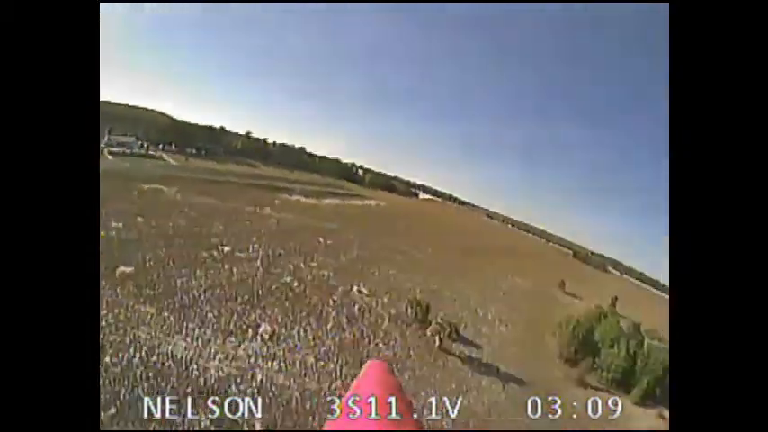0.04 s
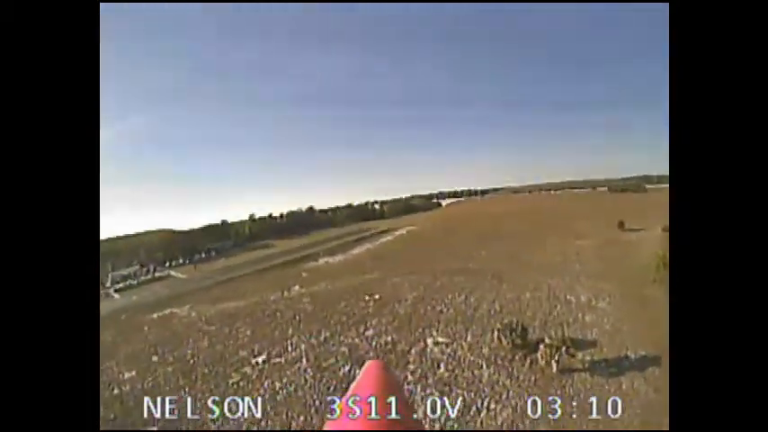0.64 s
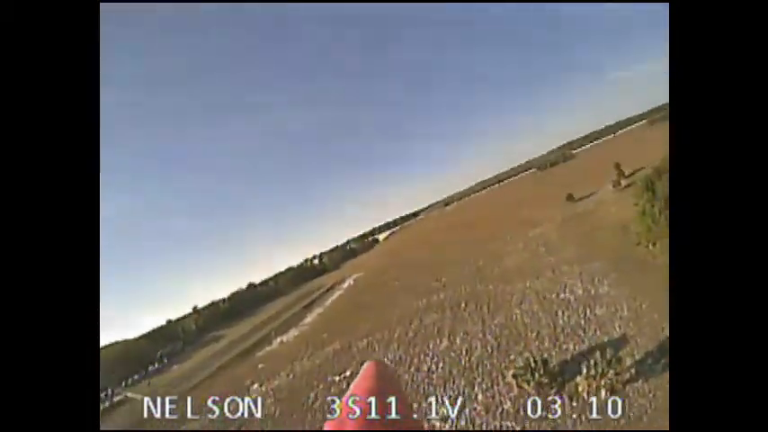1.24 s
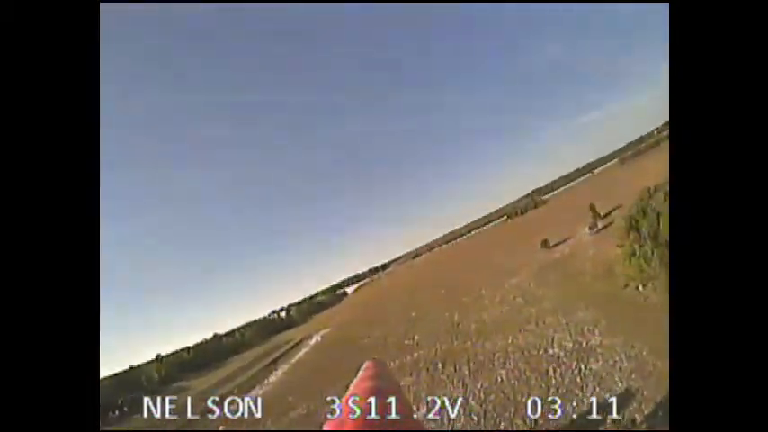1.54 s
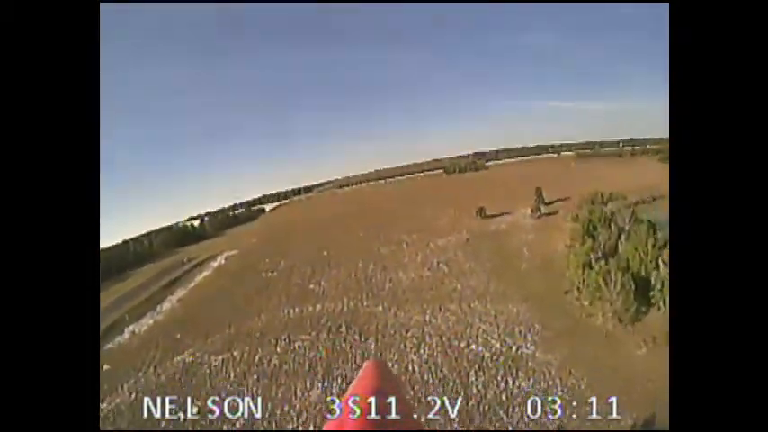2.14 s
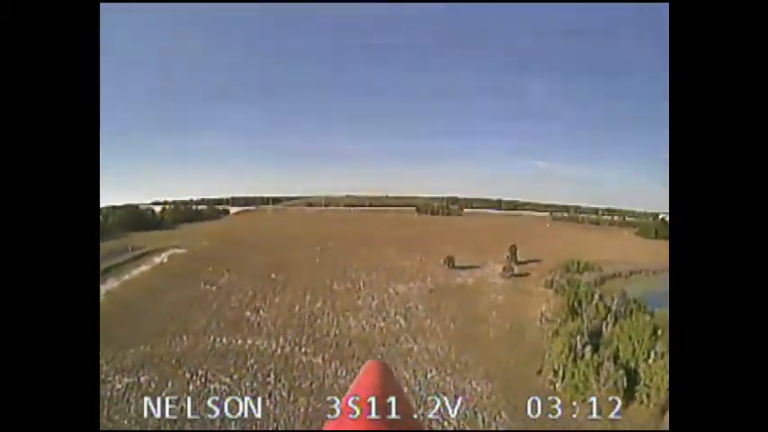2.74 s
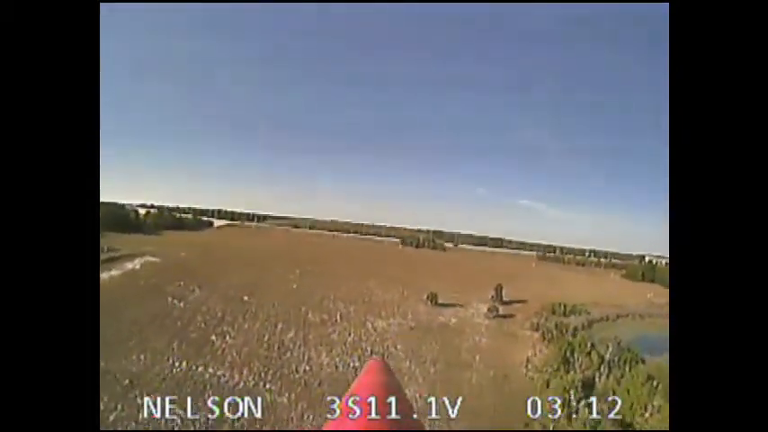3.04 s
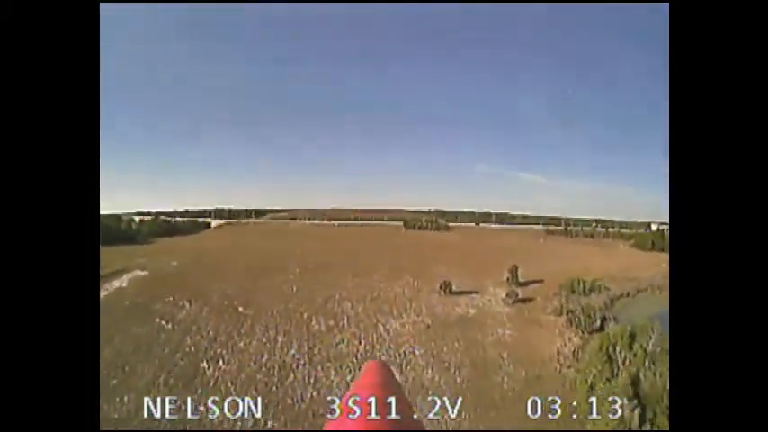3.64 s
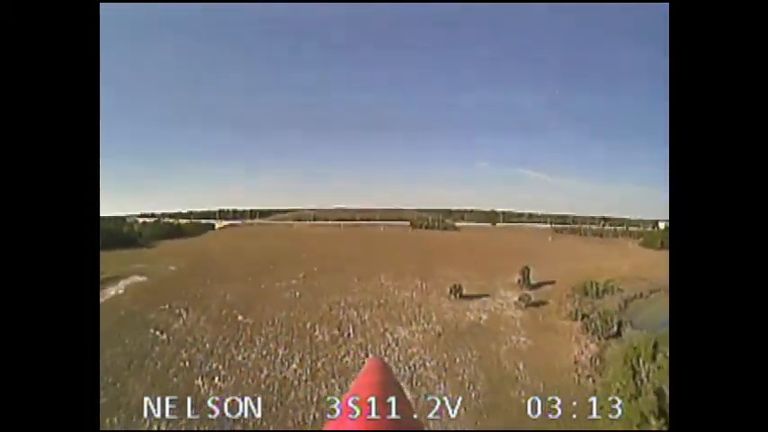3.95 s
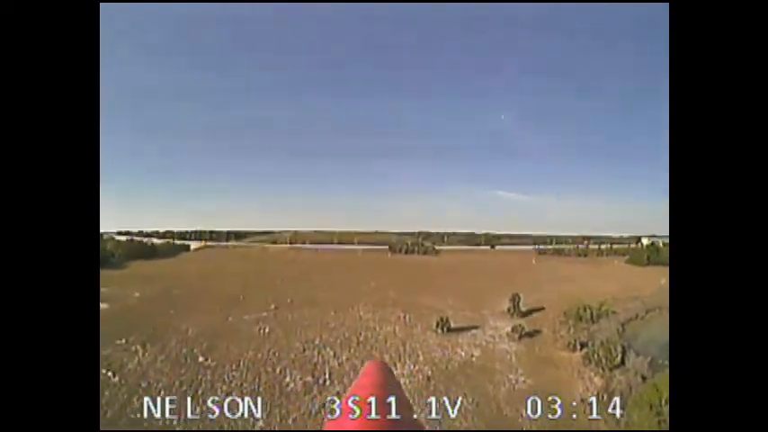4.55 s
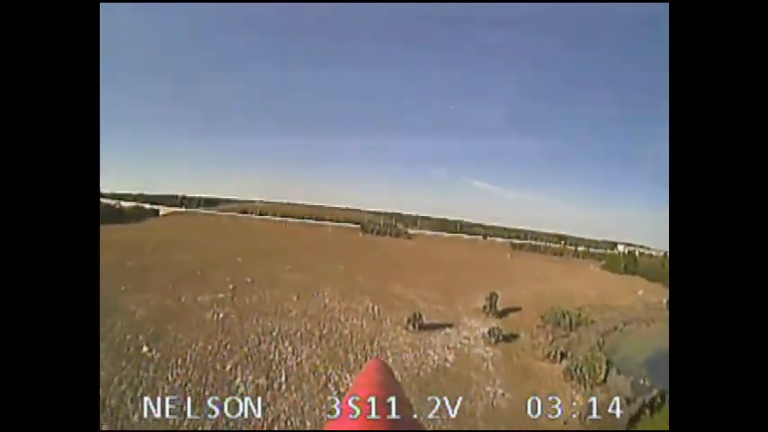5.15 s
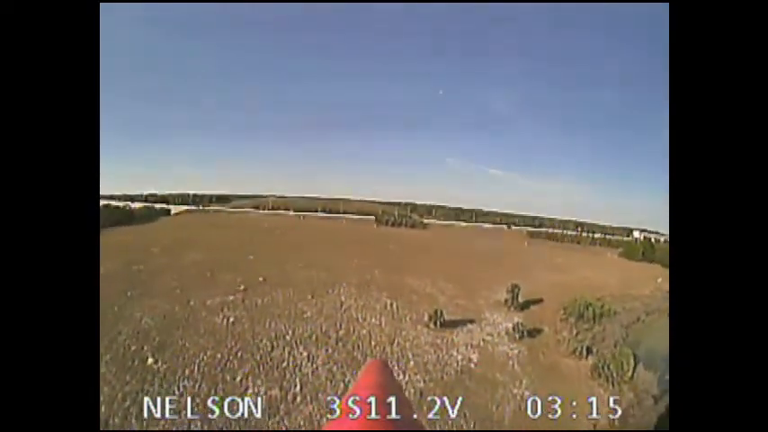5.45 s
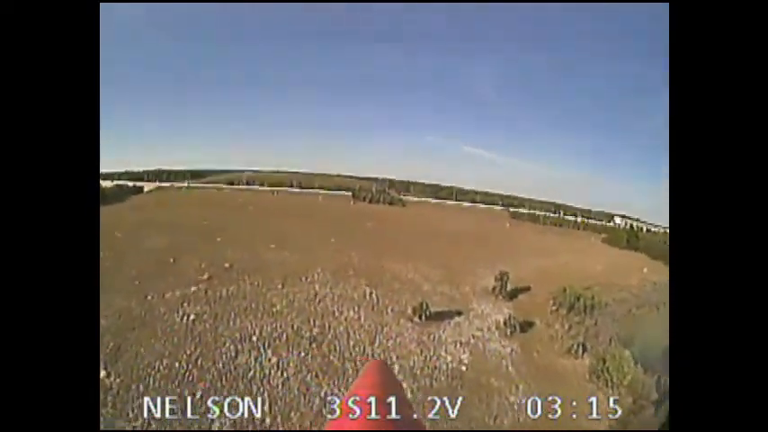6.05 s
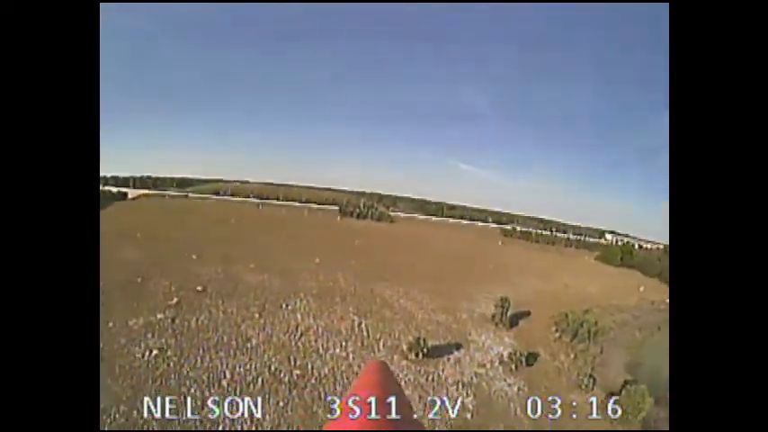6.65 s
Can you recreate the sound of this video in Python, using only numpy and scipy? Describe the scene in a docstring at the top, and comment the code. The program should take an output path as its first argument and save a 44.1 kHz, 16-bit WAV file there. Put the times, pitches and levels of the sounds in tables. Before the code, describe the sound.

A small flapping-wing model flies with a warbling gear and motor whine, under wind buffeting its overloaded onboard microphone.

```python
"""Over open ground, on the back of a flapping radio-controlled ornithopter, at its small camera.
The airstream buffets the microphone. Two drive whines, gear mesh and motor, swell in turn and
bend in pitch as each wing stroke loads them. The microphone preamplifier overloads throughout;
a narrow-band recorder carries the sound on the left channel only."""
import sys
import numpy as np
from scipy import signal
from scipy.fft import rfft, irfft
from scipy.io import wavfile
from scipy.ndimage import uniform_filter1d, map_coordinates

SR = 44100
rng = np.random.default_rng(int(sys.argv[2]) if len(sys.argv) > 2 else 0)


def int16_out(signal):
    """Quantize to a 16-bit WAV file."""
    q = np.round(np.clip(np.atleast_2d(signal).T, -1, 1) * 32767)
    wavfile.write(sys.argv[1], SR, q.astype(np.int16))


N = 299439
TIME_S = np.arange(N) / SR

# Slow airstream gusts: time_s, strength (its swing about the mean is scaled to dB in airstream)
GUSTS = [(0.0, -11.5), (1.25, -12.5), (1.58, -11.5), (2.38, -16.5), (2.5, -15.5), (2.68, -15.5),
         (3.1, -10.5), (3.37, -13.5), (3.51, -11), (4.26, -14.5), (4.41, -13), (4.65, -15.3), (4.76, -12.4),
         (4.97, -14), (5.33, -12), (5.6, -16.5), (6.25, -12.5), (6.79, -13.0)]
# Turbulence at the microphone: freq_hz, relative_density_db
BUFFET_SPECTRUM = [(15, -22), (30, -6.5), (60, -0.5), (105, -0.25), (170, -3.5), (300, -9.5), (500, -13.5),
                   (900, -23.5), (2000, -36), (4000, -47)]
# Air along the airframe: freq_hz, relative_density_db
RUSH_SPECTRUM = [(100, -5.5), (400, -0.5), (800, 0), (1400, -2.5), (2200, -9.5), (2900, -12.5), (3500, -18),
                 (4000, -15)]
# Mean drive speed: time_s, mesh_hz
DRIVE_SPEED = [(0, 574.5), (0.55, 595.8), (1.05, 571.3), (1.7, 575.8), (2.25, 556.6), (2.9, 581.2),
               (3.6, 558.6), (4.7, 559.9), (5.8, 555.5), (6.79, 558.6)]
# Gear whine over one wingbeat: beat_fraction, pitch_to_mesh_ratio, relative_level_db
GEAR_STROKE = [(.04, 1.047, 3.5), (.15, 1.02, -6), (.29, .95, -12.5), (.41, .935, -2.5), (.54, .985, 1.9),
               (.66, 1.015, -2), (.78, 1.0, -8.5), (.91, .985, 1)]
# Partials of the meshing teeth: harmonic_number, relative_level_db
TOOTH_HARMONICS = [(1, 0), (2, -15.5), (3, -24), (4, -23)]
# Rasp of the loaded gear train: freq_hz, relative_density_db
RASP_SPECTRUM = [(300, -8), (1100, 4), (1700, -4), (2300, -7), (2900, -3.5), (3500, -11.5), (4000, -7)]
# Motor whine over one wingbeat: beat_fraction, pitch_to_mesh_ratio, relative_level_db
MOTOR_STROKE = [(.02, 1.87, -18), (.15, 1.83, -3), (.26, 1.72, -2.2), (.34, 1.675, -0.5), (.39, 1.7, -14),
                (.46, 1.79, -4.5), (.53, 1.86, -17), (.62, 1.82, -1), (.73, 1.803, 1), (.85, 1.78, -0.3)]


def undb(db):
    """Decibels to gain."""
    return 10 ** (np.asarray(db) / 20)


def curve(rows):
    """Linear interpolation of (time_s, value) rows."""
    return np.interp(TIME_S, *np.transpose(rows))


def wander(rate_hz):
    """Smooth random drift, standard deviation 1."""
    size = max(int(SR / rate_hz), 2)
    steps = np.repeat(rng.standard_normal(N // size + 1), size)[:N]
    smooth = uniform_filter1d(uniform_filter1d(steps, size), size)
    return smooth / smooth.std()


def noise(spectrum):
    """Unit-rms noise shaped by (freq_hz, density_db) rows."""
    freq_hz, density_db = np.transpose(spectrum)
    bins_hz = np.maximum(np.fft.rfftfreq(N, 1 / SR), 1)
    shape_db = np.interp(np.log(bins_hz), np.log(freq_hz), density_db, right=-120)
    x = irfft(rfft(rng.standard_normal(N)) * undb(shape_db), N)
    return x / x.std()


def airstream(buffet_db=-3, rush_db=-12.5, flicker_db=0.76):
    """Low turbulence swells with gusts and short eddies; the rush above it swells less."""
    eddies = 0.25 * wander(rate_hz=20)
    gust = curve(GUSTS) - curve(GUSTS).mean() + eddies
    buffet = noise(BUFFET_SPECTRUM) * undb(buffet_db + 1.63 * gust + flicker_db * wander(rate_hz=45))
    rush = noise(RUSH_SPECTRUM) * undb(rush_db + 0.89 * gust)
    return buffet + rush


def whine(stroke, beats, mesh_hz, jitter, flutter_db, uneven_db):
    """Phase and gain of a drive tone under cyclic wing load; no two strokes alike."""
    beat_fraction, ratio, stroke_db = np.transpose(stroke)
    pitch_hz = mesh_hz * np.interp(beats, beat_fraction, ratio, period=1)
    pitch_hz *= 1 + jitter * wander(rate_hz=130)
    level_db = np.interp(beats, beat_fraction, stroke_db, period=1)
    level_db += flutter_db * wander(rate_hz=110) + uneven_db * wander(rate_hz=14)
    return 2 * np.pi * np.cumsum(pitch_hz) / SR, undb(level_db)


def gears(beats, mesh_hz, tone_db=-1.43, rasp_db=-16.5):
    """Teeth sing and rasp together as each stroke presses them into mesh."""
    phase_rad, load = whine(GEAR_STROKE, beats, mesh_hz, jitter=0.0109, flutter_db=0.7, uneven_db=0.26)
    tone = sum(undb(db) * np.sin(harmonic * phase_rad) for harmonic, db in TOOTH_HARMONICS)
    return load * (undb(tone_db) * tone + undb(rasp_db) * noise(RASP_SPECTRUM))


def motor(beats, mesh_hz, gain_db=-3):
    """Higher whine between the gear swells, sagging in pitch each time."""
    phase_rad, gain = whine(MOTOR_STROKE, beats, mesh_hz,
                            jitter=0.00791, flutter_db=0.73, uneven_db=0.34)
    return undb(gain_db) * gain * np.sin(phase_rad)


def scene():
    """Airstream and drive at one microphone; the wings are geared to the drive."""
    meshes_per_beat, start_beats = 81, 0.8
    mesh_hz = curve(DRIVE_SPEED)
    beats = start_beats + np.cumsum(mesh_hz) / SR / meshes_per_beat
    left = airstream() + gears(beats, mesh_hz) + motor(beats, mesh_hz)
    return np.array([left, np.zeros(N)])


def gain_control(x, window_s, strength):
    """Gain falls as short-term power rises; strength 0 is off, 1 is constant level."""
    power = uniform_filter1d(x ** 2, int(window_s * SR))
    return x / (power + 1e-9) ** (strength / 2)


def overload(x, drive_db, bias, knee):
    """Slightly asymmetric preamplifier flattening against its rails."""
    x = x * undb(drive_db) + bias
    return x / (1 + np.abs(x) ** knee) ** (1 / knee)


def coarse_sampler(x, rate_hz, band_hz, makeup_db, hiss_db):
    """Narrow-band sampling with hiss; linear interpolation mirrors the band into the treble."""
    x = signal.sosfilt(signal.butter(4, band_hz, fs=SR, output="sos"), x)
    ticks_s = np.arange(0, TIME_S[-1], 1 / rate_hz)
    samples = undb(makeup_db) * map_coordinates(x, [ticks_s * SR], order=3, mode="nearest")
    hiss = undb(hiss_db) * rng.standard_normal(len(ticks_s))
    return np.interp(TIME_S, ticks_s, np.clip(samples + hiss, -1, 1))


def record(dry):
    """Left channel: gain control, overload, coarse sampling. Steep low-pass at the output."""
    left = gain_control(dry[0], window_s=0.028, strength=0.48)
    left = overload(left, drive_db=0.27, bias=0.064, knee=5.4)
    left = coarse_sampler(left, rate_hz=8000, band_hz=3900, makeup_db=0.35, hiss_db=-39)
    cutoff_hz = 15600
    lowpass = signal.ellip(8, 0.02, 50, cutoff_hz, fs=SR, output="sos")
    return signal.sosfiltfilt(lowpass, np.array([left, dry[1]]))


dry = scene()
out = record(dry)
int16_out(out)
```